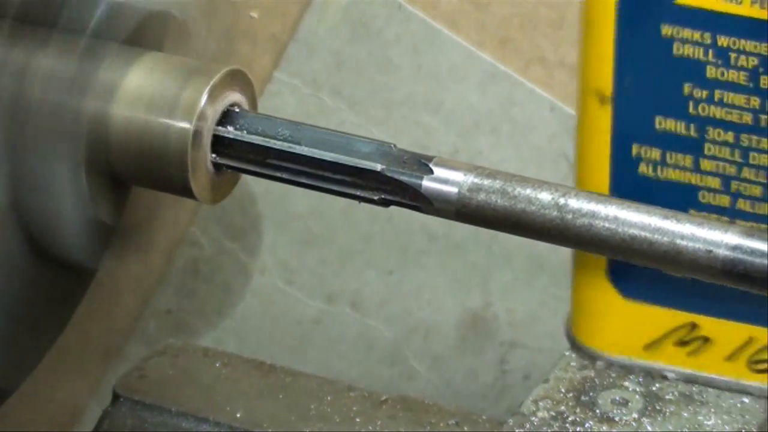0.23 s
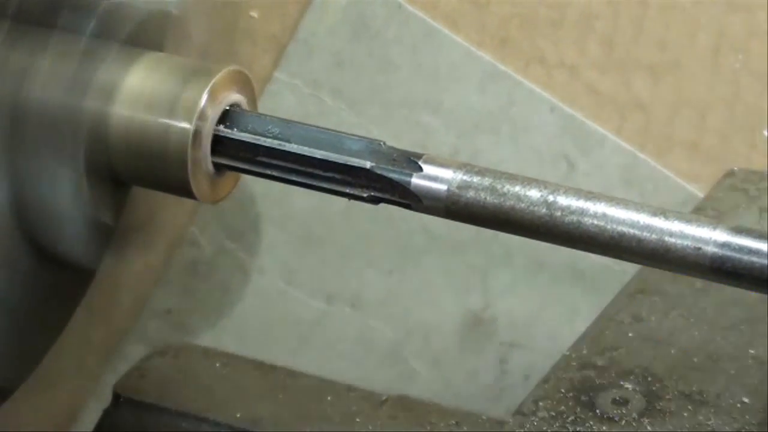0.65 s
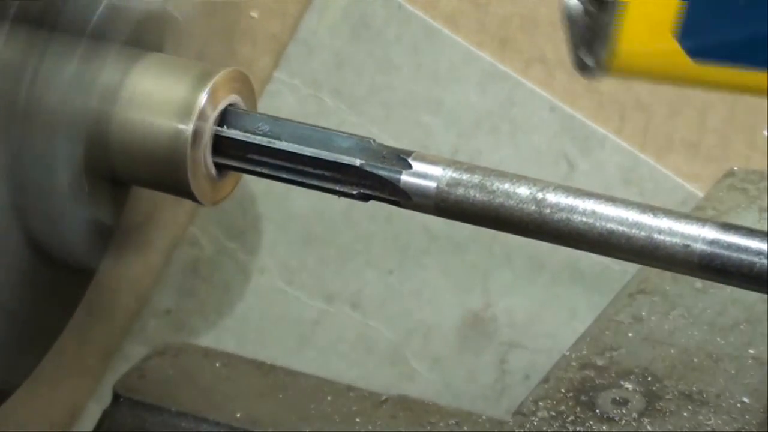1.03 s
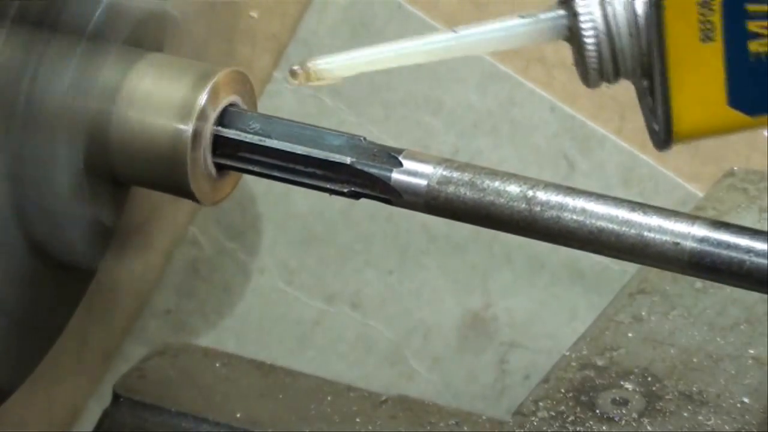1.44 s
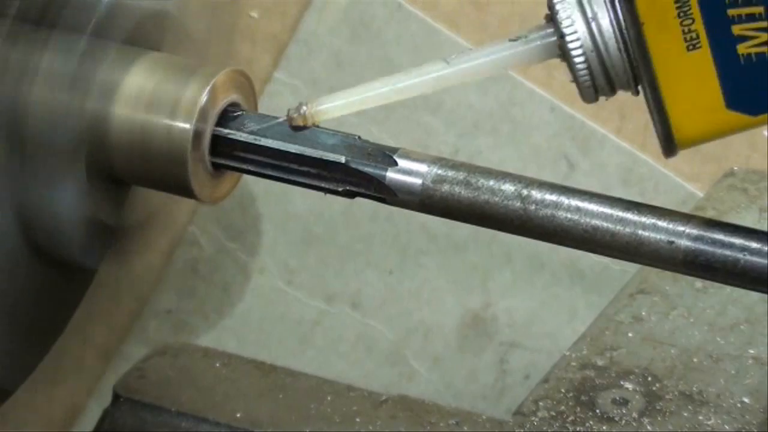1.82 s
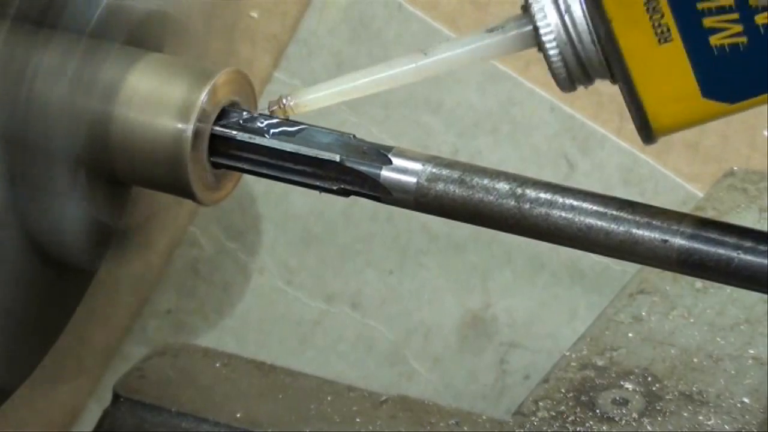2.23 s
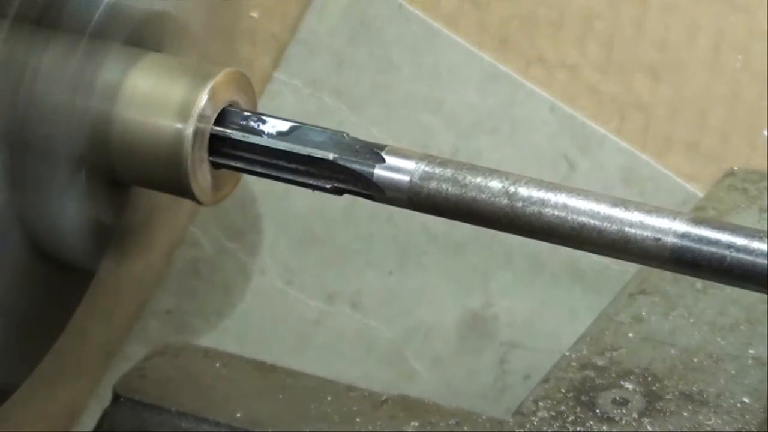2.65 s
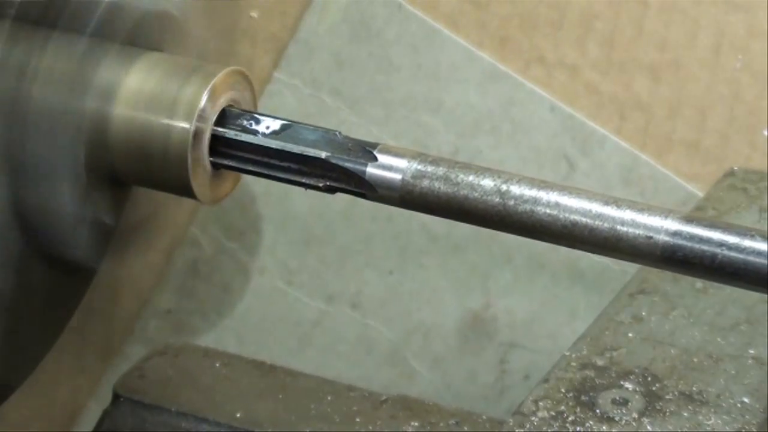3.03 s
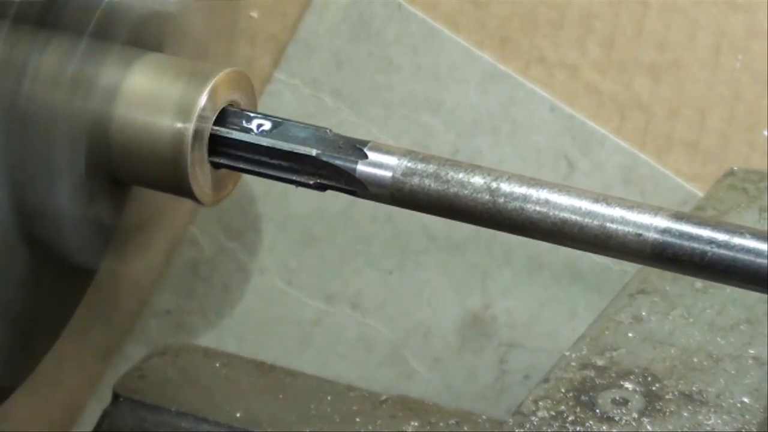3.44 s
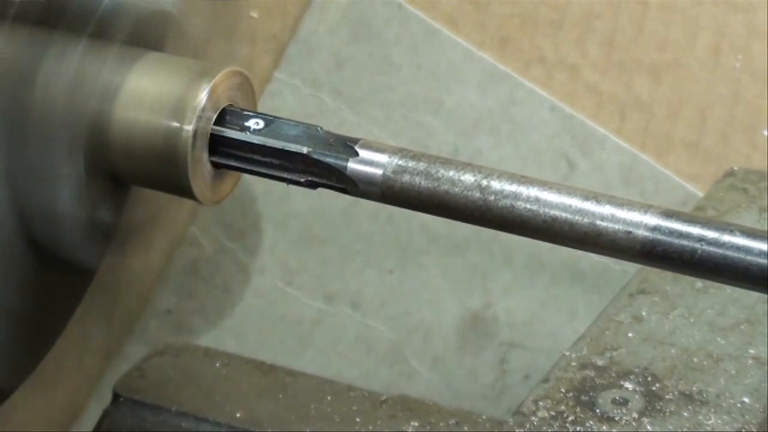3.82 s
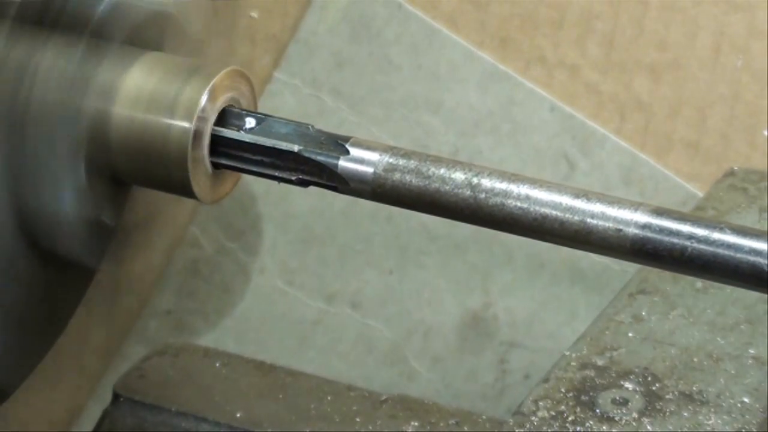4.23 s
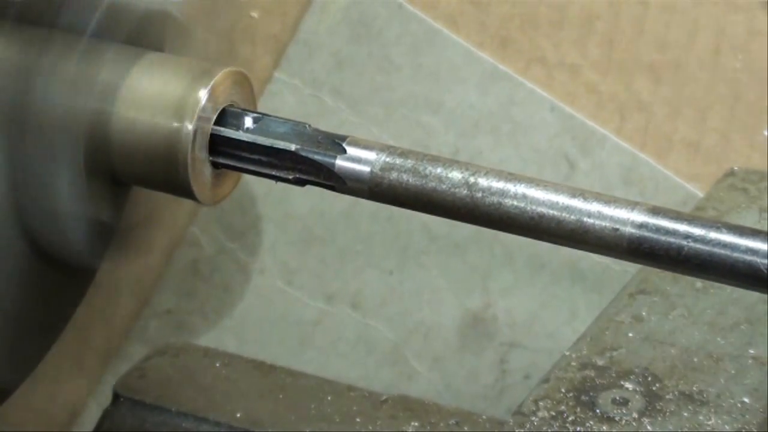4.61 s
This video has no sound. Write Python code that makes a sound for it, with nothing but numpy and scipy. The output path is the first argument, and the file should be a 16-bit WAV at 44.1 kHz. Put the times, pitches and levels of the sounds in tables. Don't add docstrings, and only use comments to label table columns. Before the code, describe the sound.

A small metal lathe runs throughout in a workshop, heard close in nearly centred stereo: a dense low-mid hum of motor and gears, fluttering about nine times a second, with rumble ringing in the casting and thin bearing hiss. At about 0.94 s a chip strikes the bed with one tiny, bright tick. At 1.37 s a reamer bites suddenly into a spinning brass bush. A harsh squeal near 4.3 kHz with two overtones bursts in, surrounded by gritty, bright metallic rasp, while the hum ducks beneath. It holds roughly until 2.3 s, then stutters with short skips until 2.85 s. Firmer squeals return until about 3.6 s, followed by broken, weaker chirps until 4.3 s. Everything throbs with the spindle as the pitch sinks toward 4 kHz. From 4.4 s the squeal grips firmly again, smoother with stronger overtones, and the rasp thins sharply after 4.6 s, still squealing at the end.

```python
import sys
import numpy as np
from scipy import signal
from scipy.fft import rfft, irfft
from scipy.io import wavfile

SR = 44100
rng = np.random.default_rng(int(sys.argv[2]) if len(sys.argv) > 2 else 0)


def nominal_scale(level):
    x = np.asarray(level, float) / 20
    return 10 ** x


def transcribe(u):
    v = np.clip(np.atleast_2d(u).T, -1, 1)
    q = np.round(v * 32767).astype(np.int16)
    wavfile.write(sys.argv[1], SR, q)


N = 214712
TIME_S = np.arange(N) / SR
LEFT_RIGHT = np.array([[1], [-1]])


def rms_one(x):
    return x / np.sqrt(np.mean(np.abs(x) ** 2) + 1e-20)


def in_time(rows):
    s, *columns = np.transpose(rows)
    return [np.interp(TIME_S, s, column) for column in columns]


def at_hz(points, hz):
    table_hz, values = np.transpose(points)
    return np.interp(np.log(hz), np.log(table_hz), values)


def since(s):
    return np.maximum(TIME_S - s, 0)


def settle(x, tau_s):
    r = np.exp(-1 / (tau_s * SR))
    return signal.lfilter([1 - r], [1, -r], x - x[0]) + x[0]


def drift(rate_hz):
    r = np.exp(-2 * np.pi * rate_hz / SR)
    run_in = 20000
    noise = rng.standard_normal(N + run_in)
    return rms_one(signal.lfilter([1], [1, -2 * r, r * r], noise)[run_in:])


def resonate(x, hz, width_hz):
    r = np.exp(-np.pi * width_hz / SR)
    zeros = np.array([1, 0, -1]) * (1 - r * r) / 2
    return signal.lfilter(zeros, [1, -2 * r * np.cos(2 * np.pi * hz / SR), r * r], x)


def body(x, modes):
    out = 0
    for k, (hz, width_hz, db) in enumerate(modes):
        contacts = np.roll(x, 997 * k, axis=-1)
        once = resonate(contacts, hz, 1.55 * width_hz)
        out = out + nominal_scale(db) * resonate(once, hz, 1.55 * width_hz)
    return out


def grit(per_s, spread_db):
    excess = np.minimum(rng.exponential(1, (2, N)), 5)
    sizes = nominal_scale(spread_db * excess) * rng.choice([-1, 1], (2, N))
    return rms_one(sizes * (rng.random((2, N)) < per_s / SR))


def stereo(mid_side, side_db, lean_db):
    mid, side = mid_side
    return (mid + nominal_scale(side_db) * side * LEFT_RIGHT) * nominal_scale(lean_db / 2 * LEFT_RIGHT)


# (frequency [Hz], spectral density [dB per Hz])
RUMBLE = [(15, -78), (25, -96), (101, -15.5), (169, -28.5), (246, 12.5), (322, -18), (509, 3.5),
          (614, -8.5), (871, -10.5), (1050, -64), (1200, -9.5), (1950, -17), (5280, -23), (8130, -28.5),
          (15500, -47.5)]
# (frequency [Hz], left-right likeness [0-1])
LIKENESS = [(60, 0.97), (180, 0.86), (550, 0.82), (1650, 1), (4970, 0.86), (15000, 0.98)]
# (frequency [Hz], left minus right [dB])
LEANING = [(60, 8), (180, -2.5), (550, 3.5), (1650, 2), (4970, 1.5), (15000, -6)]


def rumble():
    out = 0
    edges = 22 * 2 ** np.arange(0, 9.6, .5)
    white = rng.standard_normal((2, 2, N))
    for k, (low, high) in enumerate(zip(edges, edges[1:])):
        band = signal.butter(2, [low, high], "band", fs=SR, output="sos")
        pair = signal.sosfilt(band, white[k % 2])
        hz = np.sqrt(low * high)
        alike = np.clip(at_hz(LIKENESS, hz), 0, .999)
        side_db = 10 * np.log10((1 - alike) / (1 + alike))
        level_db = at_hz(RUMBLE, hz) + 0.47 * drift(16)
        out = out + nominal_scale(level_db) * stereo(pair, side_db, at_hz(LEANING, hz))
    return rms_one(out)


# (frequency [Hz], width [Hz], level [dB])
CASTING = [(250, 42, -6.5), (503.2, 30, -2.5), (1029, 118, -15), (1333.4, 23, -14.5), (1707, 720, -20.5),
           (7080, 400, -26.5), (8260, 430, -29.5), (9850, 350, -32), (11240, 480, -39.5)]


def casting():
    rings = body(grit(4000, spread_db=2.5), CASTING) * nominal_scale(1.0 * drift(15.3))
    return rms_one(stereo(rings, side_db=-13, lean_db=2.0))


def orders(shaft_hz, table, waver_db, lean_db, scatter, slip):
    first_knock_s = .063
    turn = 2 * np.pi * shaft_hz * (TIME_S - first_knock_s)
    lines = 0
    for order, db in table:
        phase = order * turn + scatter * rng.normal() + slip * drift(1.7)
        lines = lines + nominal_scale(db + waver_db * drift(5.1)) * np.cos(phase)
    return rms_one(lines) * nominal_scale(lean_db / 2 * LEFT_RIGHT)


# (multiple of the motor speed [1], level [dB])
MOTOR = [(2, -34), (3, -20), (4, -7.5), (4.515, -15), (5.03, -14), (6, -9), (7.005, -7), (7.505, -5),
         (8.017, -3), (8.535, -1.5), (9.005, 0), (10, -13), (11, -13), (14.015, -13), (19.045, -10),
         (22, -15), (24, -14)]


def motor():
    return orders(29.96, MOTOR, waver_db=3.0, lean_db=2.5, scatter=2.95, slip=0.75)


# (multiple of the gear shaft speed [1], level [dB])
GEAR = [(39, -9), (40, -14), (41, -10), (50, -11), (52, -11), (53, -7), (54, -12), (55, 0), (56, -10),
        (57, -6), (58, -4), (59, -6), (60, -7), (61, -13), (62, -15), (76, -14), (77, -10), (115, -16),
        (149, -15)]


def gears():
    return orders(8.965, GEAR, waver_db=2.5, lean_db=5.5, scatter=0.066, slip=0.085)


# (frequency [Hz], lead of the left [rad])
LEAD = [(0, 0), (520, 0.086), (1380, 0.0), (2930, 0.03), (15400, -0.0)]


def off_axis(x):
    lead = at_hz(LEAD, np.fft.rfftfreq(N, 1 / SR) + 1)
    return irfft(rfft(x) * np.exp(.5j * lead * LEFT_RIGHT), N)


# (time [s], peak level [dB], frequency [Hz])
CHIP = [
    (0.938, -17.5, 6500),
]


def chip():
    out = np.zeros(N)
    for s, db, hz in CHIP:
        age = np.clip(TIME_S - s, 0, .1)
        push = (age / 0.0011) ** 2 * np.exp(2 - 2 * age / 0.0013)
        ring = np.sin(2 * np.pi * hz * age) + .4 * np.sin(2 * np.pi * 1.14 * hz * age)
        out += nominal_scale(db + 2.5) * push * ring
        scatter = rng.standard_normal(N) * np.minimum(age / .002, 1) * np.exp(-age / .012)
        out += nominal_scale(db - 4) * body(scatter, [(hz, 2600, 0)])
    return out


THROB = [(1, .09), (2, .17), (3, .2), (5, .05), (6, .1), (7, .12), (10, .08), (14, .04)]


def throb(depth):
    spindle_hz, high_spot_s = 9.2, .046
    turn = 2 * np.pi * spindle_hz * (TIME_S - high_spot_s)
    load = 0
    for order, share in THROB:
        slip = .45 * order ** .5 * drift(.4)
        load = load + share * np.cos(order * turn + slip)
    return np.exp(depth * load)


BITE_S, BITE_RISE_S, SEATING_S = 1.368, .014, 0.21


def seating():
    return np.exp(-since(BITE_S) / SEATING_S)


# (start [s], length [s], firmness [0-1], squeal level [dB], overtone level [dB])
GRIPS = [(1.353, 0.64, 0.73, -11.5, -17.5), (2.01, 0.31, 0.68, -12, -20.5),
         (2.341, 0.028, 0.13, -11.5, -45), (2.478, 0.029, 0.03, -17, -46), (2.577, 0.079, 0.6, -14, -16),
         (2.703, 0.051, 0.62, -10, -23), (2.857, .225, 0.8, -15, -17), (3.128, 0.32, 0.87, -13, -15),
         (3.466, 0.13, 0.77, -13, -16), (3.687, 0.034, 0.3, -12, -23), (3.783, 0.078, .4, -14, -18),
         (3.903, 0.055, 0.79, -12, -19.5), (3.99, 0.11, .1, -21, -33), (4.09, 0.18, 0.25, -13.5, -19),
         (4.29, 0.12, 0.2, -17, -35), (4.392, 0.375, 0.82, -13, -14.5), (4.67, 0.19, 0.7, -13, -11)]
GRAB_S, LET_GO_S = .014, 0.022
SLACK_SQUEAL_DB, SLACK_OVERTONE_DB = -23.5, -33


def grip():
    slack = np.array([0, SLACK_SQUEAL_DB, SLACK_OVERTONE_DB])
    out = np.zeros((3, N))
    for s, length_s, *held in GRIPS:
        shape = np.minimum(since(s) / GRAB_S, 1) * np.exp(-since(s + length_s) / LET_GO_S)
        out = np.maximum(out, np.outer(np.array(held) - slack, shape))
    return out + slack[:, None]


# (time [s], pitch [Hz])
PITCH = [(1.385, 4318), (1.62, 4235), (2.1, 4190), (2.8, 4172), (3.3, 4128), (3.56, 4130), (3.7, 4160),
         (3.97, 4150), (4.06, 4066), (4.3, 4040), (4.4, 4050), (4.69, 4012), (4.87, 4034)]
SMOOTH_S = 4.32
THIRD_DB, THIRD_FOLLOWS, THIRD_GAIN_DB_PER_S = -15.5, 0.58, 11
UNSEATED_OVERTONE_DB, SLACK_STEADINESS = -18, 0.17
WAVER_HZ, SLACK_WAVER_HZ = 11, 45


def squeal():
    pitch_hz, = in_time(PITCH)
    firmness, first_db, second_db = grip()
    hold = SLACK_STEADINESS + (1 - SLACK_STEADINESS) * firmness
    second_db = second_db + UNSEATED_OVERTONE_DB * seating()
    third_db = second_db + THIRD_DB + (THIRD_FOLLOWS - 1) * (second_db - second_db.max())
    third_db += THIRD_GAIN_DB_PER_S * since(SMOOTH_S)
    waver_hz = WAVER_HZ + SLACK_WAVER_HZ * (1 - np.minimum(firmness, 1)) ** 2
    phase = 2 * np.pi * np.cumsum(pitch_hz + waver_hz * drift(80)) / SR
    load, out = throb(1.6), 0
    partials = [(first_db - 2.6 * seating(), .8, 1.2, 1.8), (second_db, .9, 1.9, 1.5), (third_db, 1.3, 2.3, 1.2)]
    for k, (db, steady, limit, trim_db) in enumerate(partials, start=1):
        slow_hz, fast_hz = 32 * k ** .6, 100 * k ** .6
        fade = []
        for _ in range(2):
            slow = drift(slow_hz) + 1j * drift(slow_hz)
            fast = drift(fast_hz) + 1j * drift(fast_hz)
            fade.append(.62 * slow + .2 * fast)
        swing = (steady * hold + fade[0]) * load * nominal_scale(1.2 * (k - 1) * drift(25))
        limited = swing / np.sqrt(1 + np.abs(swing / limit) ** 2)
        carrier = np.exp(1j * k * phase)
        pair = [rms_one(np.real(part * carrier)) for part in (limited, fade[1])]
        out = out + nominal_scale(db + trim_db) * stereo(pair, side_db=-15.5, lean_db=0)
    return out


# (start [s], length [s])
SKIPS = [
    (2.443, 0.036),
    (2.548, 0.028),
    (2.672, 0.014),
    (2.836, 0.017),
]


def skating():
    lifted = sum((since(s) > 0) * (since(s + length_s) == 0) * 1. for s, length_s in SKIPS)
    return settle(lifted, .003)


# (frequency [Hz], width [Hz], level [dB])
LOWER_MODES = [(2800, 450, -14), (3280, 400, -13), (3785, 60, 0), (3700, 350, -11), (3980, 200, -7),
               (4160, 240, -4), (4450, 350, -13), (5620, 190, -15), (1700, 1000, -17)]
# (frequency [Hz], width [Hz], level [dB])
MIDDLE_MODES = [(6980, 95, 8.5), (7260, 2500, -11), (7520, 67, 8), (8000, 1000, 1), (11230, 450, -4.5),
                (11650, 890, -19.5), (14100, 620, -13), (15200, 400, -28), (5640, 137, -1)]
# (frequency [Hz], width [Hz], level [dB])
UPPER_MODES = [(9150, 105, 3.5), (9720, 200, 1), (10430, 400, -39)]
# (frequency [Hz], width [Hz], level [dB])
MIXING_MODES = [(4900, 176, -13), (8420, 340, 3), (12900, 340, -19)]
# (slack [dB], change when gripping [dB], change with depth [dB per s], extra while seating [dB])
LOWER_RASP, MIDDLE_RASP, UPPER_RASP = (-22.5, -2, 2.64, 7.5), (-25, 5.5, 0.58, 1), (-23, 6, -1.23, 2.5)
POLISH_S, SKIP_DB = 4.6, -11
LOWER_LOSS_DB_PER_S, MIDDLE_LOSS_DB_PER_S, UPPER_LOSS_DB_PER_S = 21.5, 47, 99
MIXING_DB, MIXING_RISE_S, MIXING_LOSS_DB_PER_S = -22, 0.09, 25


def rasp_db(slack_db, grip_db, db_per_s, seat_db):
    return slack_db + grip_db * grip()[0] + db_per_s * since(BITE_S) + seat_db * seating()


def rasp():
    polished_s, skate = since(POLISH_S), skating()
    lower_db = rasp_db(*LOWER_RASP) - LOWER_LOSS_DB_PER_S * since(SMOOTH_S)
    middle_db = rasp_db(*MIDDLE_RASP) - MIDDLE_LOSS_DB_PER_S * polished_s + SKIP_DB / 2 * skate
    upper_db = rasp_db(*UPPER_RASP) - UPPER_LOSS_DB_PER_S * polished_s + SKIP_DB * skate
    mixing = np.minimum(since(SMOOTH_S) / MIXING_RISE_S, 1)
    mixing = mixing * nominal_scale(MIXING_DB - MIXING_LOSS_DB_PER_S * polished_s)
    load = rms_one(throb(0.34) * nominal_scale(0.9 * drift(18)))
    coarse, fine = grit(7000, spread_db=4.5), grit(9000, spread_db=4.0)
    rings = rms_one(body(coarse, LOWER_MODES)) * nominal_scale(lower_db + 1.0)
    rings += rms_one(body(fine, MIDDLE_MODES)) * nominal_scale(middle_db + 2.5)
    rings += rms_one(body(fine, UPPER_MODES)) * nominal_scale(upper_db)
    rings += rms_one(body(coarse, MIXING_MODES)) * mixing * nominal_scale(4.0)
    return load * stereo(rings, side_db=-14.5, lean_db=0)


def scene():
    hum_db, flutter_db = -17, 2.04
    lathe = nominal_scale(-4.5) * rumble() + nominal_scale(-3.5) * casting()
    lathe += nominal_scale(-5.5) * motor() + nominal_scale(-6.5) * gears()
    bite = np.minimum(since(BITE_S) / BITE_RISE_S, 1) * nominal_scale(flutter_db * drift(130))
    return nominal_scale(hum_db) * off_axis(lathe) + chip() + bite * (squeal() + rasp())


def roll_off(x):
    return signal.sosfilt(signal.butter(12, 15820, fs=SR, output="sos"), x)


def record(dry):
    duck_slack_db, duck_grip_db, duck_s = -2, -2.5, .02
    limit_db, limit_share, limit_s = -16, .65, .003
    duck_db = (since(BITE_S) > 0) * (duck_slack_db + duck_grip_db * grip()[0])
    dry = dry * nominal_scale(settle(duck_db, duck_s))
    level_db = 10 * np.log10(settle(np.mean(dry ** 2, axis=0), limit_s) + 1e-9)
    excess_db = settle(np.maximum(level_db - limit_db, 0), limit_s / 2)
    dry = dry * nominal_scale(-limit_share * excess_db)
    mid, side = (dry[0] + dry[1]) / 2, (dry[0] - dry[1]) / 2
    side = signal.sosfiltfilt(signal.butter(4, 9300, fs=SR, output="sos"), side)
    mid = mid + nominal_scale(-76) * rng.standard_normal(N)
    rounded = .85 * np.tanh(np.array([mid + side, mid - side]) / .85)
    return roll_off(rounded)


dry = scene()
out = record(dry)
transcribe(out)
```